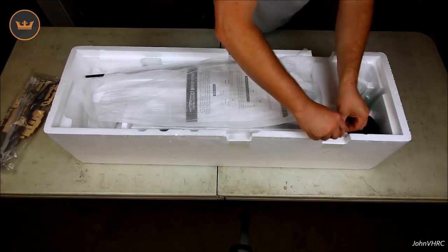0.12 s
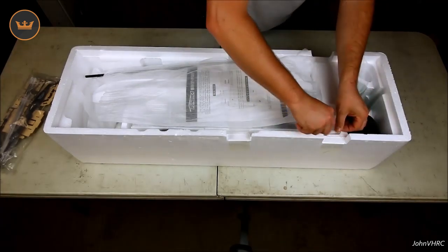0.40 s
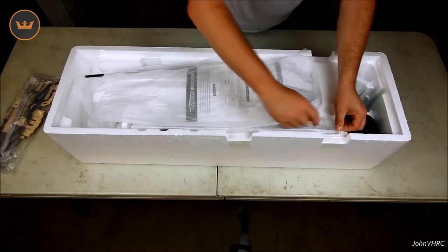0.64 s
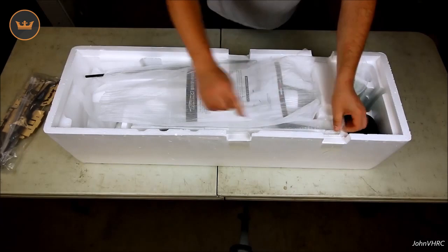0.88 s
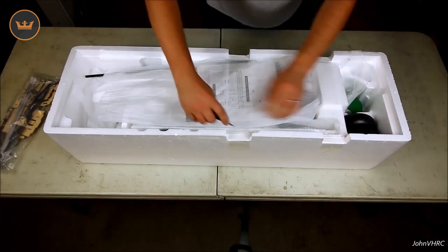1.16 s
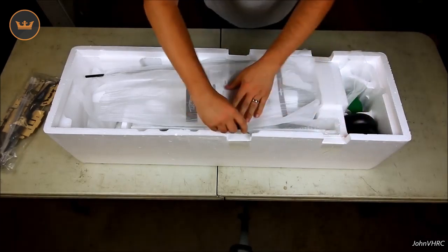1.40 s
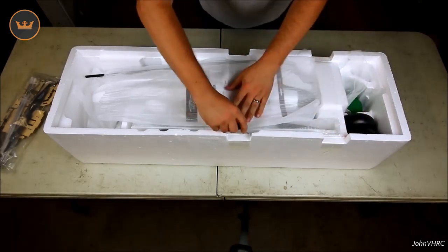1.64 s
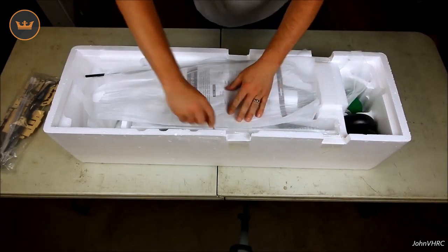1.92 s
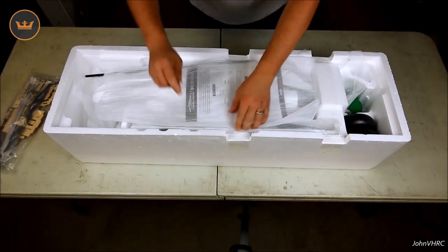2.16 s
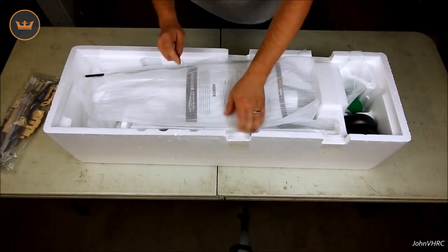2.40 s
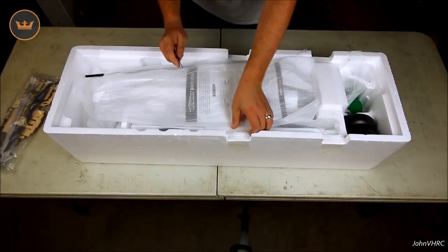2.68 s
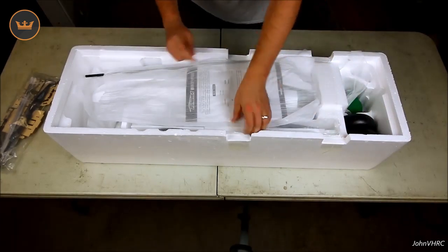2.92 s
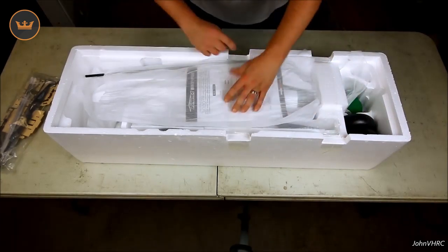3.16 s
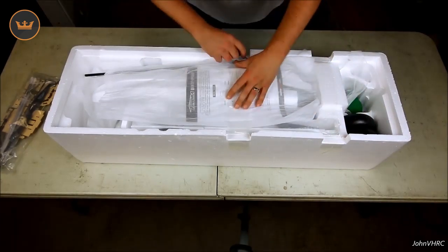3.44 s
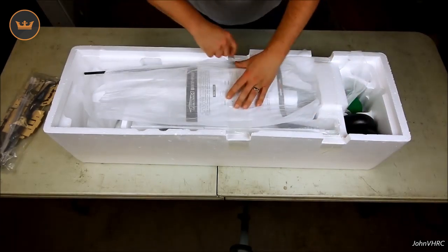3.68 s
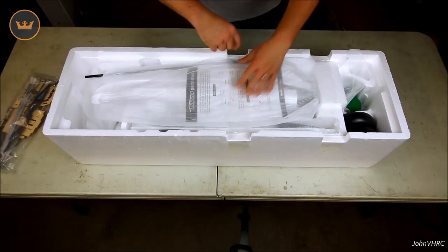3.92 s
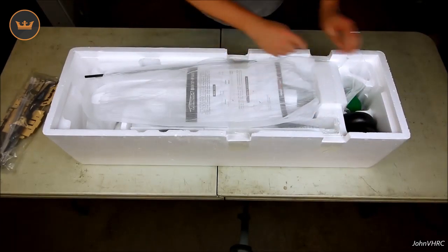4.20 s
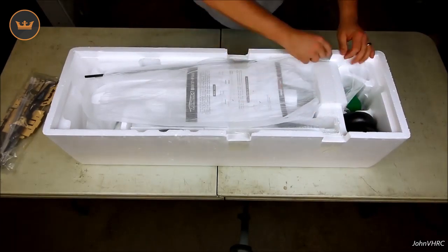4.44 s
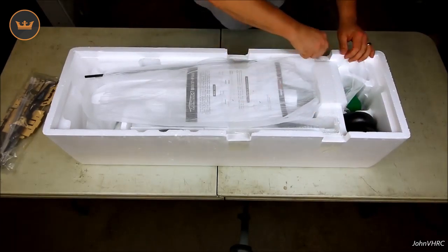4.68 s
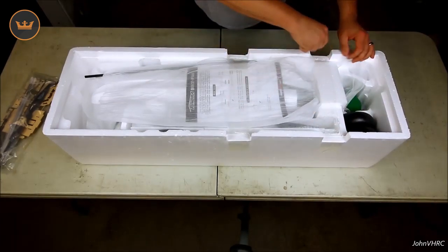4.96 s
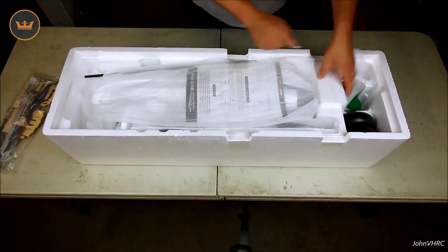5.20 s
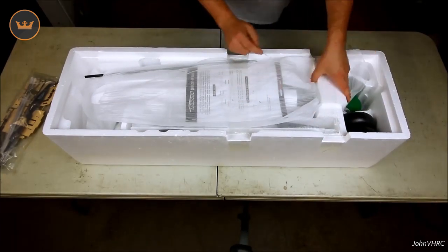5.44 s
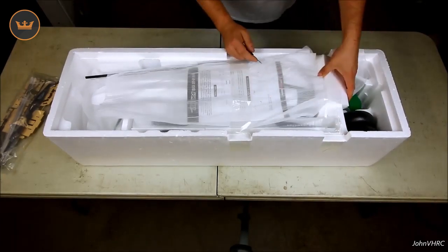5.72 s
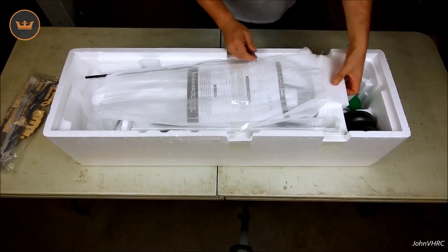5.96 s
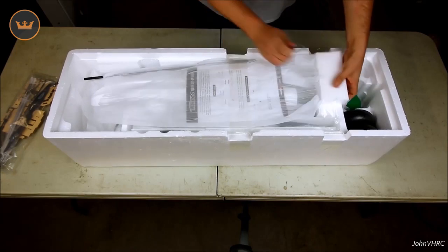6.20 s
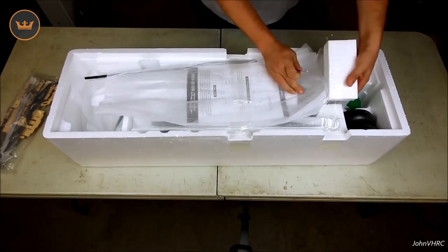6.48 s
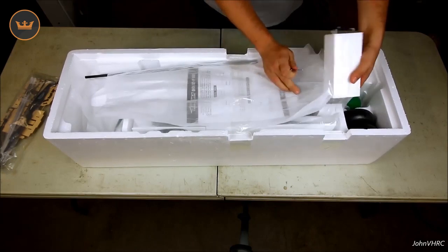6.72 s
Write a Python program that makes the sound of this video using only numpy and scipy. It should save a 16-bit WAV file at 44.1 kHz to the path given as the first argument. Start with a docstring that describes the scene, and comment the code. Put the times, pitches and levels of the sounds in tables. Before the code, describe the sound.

Close stereo pickup in a small room, slightly from the right, over faint steady hum and hiss. At about 0.2 s a sharp plastic snap starts a crinkle, with smaller pops and rustles at 0.35-0.9 s. Near quiet follows, with faint scuffs around 1.3-1.5 s. A loud cluster of cracks bursts at 1.6-1.8 s with soft low table thumps. From 2 to 3.3 s there are only light ticks, thin rustles and small finger scuffs. Another tight burst of duller, lower pops comes at 3.6-3.7 s, then fades. After a lull, bright snaps arrive at 4.6-4.8 s. From 5.2 s the crinkling thickens, with the strongest crack near 5.6 s, and a fizzy rustle swells around 6.1 s. At 6.4 s a very short hollow foam judder and hard snaps lead into dense, rapid crackling that lasts to the end, near 6.9 s.

```python
"""Plastic film and tape, peeled by hand off foam parts in a shipping box on a table in a small room.
The film buckles in sharp snaps (runs of cracks through a ringing patch) over a rustle of sparse clicks.
Pushes ring the modes of the foam box; scuffs and a judder are slips through a resonance; jolts thump the table.
A close pair of microphone ports hears it a little from the right, over a faint hum and hiss of shaped noise."""
import sys
import numpy as np
from scipy import signal
from scipy.fft import rfft, irfft
from scipy.io import wavfile
from scipy.ndimage import uniform_filter1d

SR = 44100
rng = np.random.default_rng(int(sys.argv[2]) if len(sys.argv) > 2 else 0)


def volts(x):
    """Linear amplitude factor 10**(x/20) for a level x in dB, scalar or array-like."""
    e = np.asarray(x, float) / 20
    return 10 ** e


def to_wav(sig):
    """Store sig (one row per channel, or 1-D mono) as 16-bit WAV at the path in sys.argv[1].

    Samples outside -1..1 are clipped; the rate is SR.
    """
    pcm = np.clip(np.atleast_2d(sig), -1, 1) * 32767
    pcm = np.round(pcm).astype(np.int16)
    wavfile.write(sys.argv[1], SR, pcm.T)  # frames by channels


N = 301644


def evened(x):
    """Scales to rms 1."""
    return x / np.sqrt(np.mean(x ** 2) + 1e-20)


def read(points, f_hz):
    """Interpolates a spectrum on a log-frequency axis."""
    f, value = np.transpose(points)
    return np.interp(np.log(f_hz + 1), np.log(f + 1), value)


def add(mix, t_s, sound):
    """Lays a sound into the mix at a time."""
    part = mix[..., round(t_s * SR):][..., :sound.shape[-1]]
    part += sound[..., :part.shape[-1]]


def causal(gain):
    """Minimum-phase impulse response for a gain over the full circle of frequencies."""
    log_gain = np.log(gain)
    phase = -signal.hilbert(log_gain).imag
    return np.fft.ifft(np.exp(log_gain + 1j * phase)).real[:1024]


def ring(f_hz, width_hz, size=2048):
    """One dying mode of energy 1."""
    t = np.arange(size) / SR
    taps = np.exp(-np.pi * width_hz * t) * np.sin(2 * np.pi * f_hz * t)
    return taps / np.linalg.norm(taps)


# relative spectrum of hum and hiss: f/Hz, level/dB
AIR = [(18, -45.5), (30, -9.5), (90, -7.5), (127, -6.5), (199, -13.5), (239, -9.5), (295, -19.5),
       (988, -18.5), (1320, -25), (16000, -37)]
# left-right likeness of the air: f/Hz, coherence/1
AIR_SAME = [(60, 0.547), (950, 0.0819), (15000, 0.04)]


def air(rms_db=-56):
    """Steady hum and hiss: shaped noise, alike at both ports only in the bass."""
    hz = np.fft.rfftfreq(2048, 1 / SR)
    a, b, c, d = rng.standard_normal((N // 512 + 5, len(hz), 4)).T
    same = np.clip(read(AIR_SAME, hz), -1, 1)[:, None]
    left, other = a + 1j * b, c + 1j * d
    right = same * left + np.sqrt(1 - same ** 2) * other
    z = np.array([left, right]) * volts(read(AIR, hz))[:, None]
    noise = signal.istft(z, nperseg=2048, noverlap=1536)[1][:, :N]
    return volts(rms_db) * evened(noise)


# quick pulls, after which the sheet settles:
# peak t/s, rustle level/dB, settling by 20 dB t/s, pressure on foam re rustle/dB, thin fizz re rustle/dB
TUGS = [(.105, -49.5, 0.87, -8, 2.5), (.188, -31.5, 0.1883, -6, -2), (.34, -37.5, 0.2552, -13.5, -10),
        (.452, -34, 0.0941, -5, -9), (.592, -36, 0.1534, -13.5, -7.5), (.955, -42, 0.0469, -7, -24),
        (1.325, -45.5, 0.1033, -4, -11), (1.44, -49.5, 0.2478, -4.5, -11.5), (1.567, -47, 0.1476, 1, -16),
        (1.598, -48, 0.138, -1.5, -12), (1.638, -32, 0.2491, -7.5, -28), (1.768, -28.5, 0.1416, -3, -6),
        (2.09, -48, 0.2365, -6, -3), (2.228, -42, 0.0619, -9, -6), (2.365, -46.5, 0.1076, -5.5, -1),
        (2.452, -48.5, 0.1304, -3.5, -12.5), (2.54, -44, 0.193, -1.5, -5),
        (2.768, -40.5, 0.0354, -15.5, -9.5), (3.42, -46, 0.0918, -2.5, -25), (3.505, -47, 0.2324, -4.5, -8),
        (3.588, -32, 0.2735, -4, -27), (3.652, -30, 0.0673, -7.5, -7), (3.69, -29, 0.0168, -4.5, -18.5),
        (3.708, -28.5, 0.1447, -5, -18.5), (3.845, -43, 0.1576, -22, 1), (4.336, -41.5, 0.0947, -11, -8),
        (4.442, -47, 0.1004, -5.5, -11), (4.628, -35, 0.1556, 1.5, -5), (4.744, -27, 0.075, -6.5, -16),
        (4.78, -31.5, 0.1067, -8.5, -17.5), (5.206, -37.5, .5, -10.5, -1.5),
        (5.408, -28, 0.2591, -9.5, -9.5), (5.587, -25.5, 0.1529, -8.5, -7), (5.797, -37, 0.3865, -8.5, 3),
        (6.062, -32.5, 0.2447, -13.5, -9), (6.245, -34, 0.0632, -9.5, 2), (6.303, -34, 0.2342, -16.5, 1.5),
        (6.4, -36, 0.12, 5, -16.5), (6.484, -31, 0.1945, -11.5, -10), (6.625, -32.5, 0.03, -4.5, -6.5)]
# hand drags over the sheet, swelling and fading alike:
# middle t/s, rustle level/dB, fade by 20 dB t/s, pressure re rustle/dB, fizz re rustle/dB
SLIDES = [(.06, -52.5, 0.5912, -1, -10.5), (.83, -53.5, 0.2103, -6.5, -18),
          (.874, -33, 0.0379, -16.5, -2.5), (2.35, -47, 0.0668, -12.5, 1.5),
          (2.398, -42.5, 0.066, -5, -7.5), (2.61, -46, 0.1125, -10.5, -5.5), (2.75, -44, 0.057, -12, -4.5),
          (4.39, -54.5, 0.0861, 5.5, -12.5), (5.245, -38.5, 0.0356, -10, -3), (2.85, -47, 0.14, -11.5, -3),
          (2.955, -42, 0.1256, -11.5, 0.5), (3.18, -48.5, 0.0618, 1.5, -8.5),
          (3.278, -46.5, 0.0663, -5, -6.5), (4.585, -44, 0.0513, -6.5, -5), (4.675, -31, 0.0327, -2, -5),
          (4.95, -49, 0.2367, -2.5, -3.5), (5.94, -33.5, 0.1467, -13.5, -6.5),
          (6.135, -29.5, 0.1674, -13.5, -0.5), (6.35, -29, 0.0672, -23.5, 1),
          (6.652, -23, 0.0495, -7.5, -1.5), (6.78, -28, 0.1484, -7.5, -10)]
# hands lying still: rustle level/dB, pressure re rustle/dB, fizz re rustle/dB
REST = (-66.5, -3, -5)


def handling(tug_rise_s=0.019585, curve=1.1036):
    """Rustle, pressure and fizz over time: the powers of all tugs and slides add up."""
    t = np.arange(0, N / SR + .002, .001)
    rest_db = REST[0] + np.array([0, REST[1], REST[2]])
    power = np.ones((len(t), 1)) * volts(rest_db) ** 2
    for table, rise_s in ((TUGS, tug_rise_s), (SLIDES, None)):
        for peak_s, db, fade_s, push_db, fizz_db in table:
            away = np.where(t < peak_s, (peak_s - t) / (rise_s or fade_s), (t - peak_s) / fade_s)
            drop_db = 20 * away[:, None] ** curve  # curve over 1: lingers before it drops
            power = power + volts(db - drop_db + [0, push_db, fizz_db]) ** 2
    return [np.interp(np.arange(N) / SR, t, level) for level in np.sqrt(power).T]


def creases(count, per_s, spread_db, clump_db, clump_s):
    """Rows of sparse clicks of uneven size, each row busy and idle by turns; total power 1."""
    size = round(clump_s * SR)
    drift = uniform_filter1d(rng.standard_normal((count, N)), size)
    clumps = evened(uniform_filter1d(drift, size))
    clicks = (rng.random((count, N)) < per_s / SR) * rng.choice([-1., 1.], (count, N))
    size_db = spread_db * np.minimum(rng.exponential(1, (count, N)), 4)
    clicks *= volts(size_db + clump_db * np.tanh(clumps))
    return evened(clicks) / np.sqrt(count)


# body of a crease: f/Hz, level/dB
FILM = [(300, -8.5), (800, -3.5), (2000, -4), (4000, -6), (6000, -12.5), (12000, -14.5), (16000, -22)]
# edge of a crease: f/Hz, level/dB
FIZZ = [(2000, -46.5), (4500, 9), (6000, 10.5), (10000, 8.5), (14000, -0.5), (17000, -7)]


def colours():
    """Frequencies in Hz, and the gains of film body and crease edge, each of energy 1."""
    hz = abs(np.fft.fftfreq(4096, 1 / SR))
    return hz, evened(volts(read(FILM, hz))), evened(volts(read(FIZZ, hz)))


def patch(film, f, ring_hz, ring_db, sharpness):
    """Gain of the film where one freed patch rings at its own pitch."""
    peak_db = ring_db / (1 + (2 * sharpness * (f / ring_hz - 1)) ** 2)
    return evened(film * volts(peak_db))


# modes of the foam box: f/Hz, width/Hz, level/dB
FOAM = [(93.076, 13.4, -12), (121.08, 59.1, -11), (220.84, 65.8, 2), (339.84, 118.38, 2), (490, 80, 1.5),
        (610, 133.06, 1), (718.31, 35.19, -1.5)]


def box(push):
    """A push rings the modes of the foam box, in alternating sign."""
    taps = sum((-1) ** k * volts(db) * ring(hz, width_hz, size=4096)
               for k, (hz, width_hz, db) in enumerate(FOAM))
    return signal.oaconvolve(push, taps[None] / np.linalg.norm(taps), axes=1)[:, :N]


# samples by which each part of the sheet reaches the left port after the right
LAGS = [2, 0, 2, 2]
# the tighter the sheet is pulled, the more its small high patches ring: t/s, slope/(dB per octave)
TAUT = [(.2, -2.5), (.8, .5), (1.3, -1.5), (1.7, -.5), (2.1, .5), (2.55, -1.5), (2.95, .5), (3.2, -2.5),
        (3.75, -2.5), (3.86, 1.5), (4.35, -1.5), (4.75, 1.5), (5.25, .5), (5.6, -2.5), (5.9, 1.5),
        (6.12, 2.5), (6.33, 3.5), (6.5, .5), (6.66, 1.5), (6.84, -.5)]


def rustle():
    """Tiny creases all over the sheet: twelve patches crackle by turns, each in its own colour."""
    body, push, fizz = handling()
    f, film, edge = colours()
    pitches_hz = np.geomspace(800, 5500, 12)
    rings = np.array([causal(patch(film, f, hz, 13, 3.5)) for hz in pitches_hz])
    slope_db = np.interp(np.arange(N) / SR, *np.transpose(TAUT))
    share = volts(np.log2(pitches_hz)[:, None] * slope_db)
    share /= np.sqrt(np.mean(share ** 2, 0))
    clicks = body * share * creases(len(rings), 430, 3.7, 5, .012)
    crackle = signal.oaconvolve(clicks, rings, axes=1)[:, :N]
    edges = fizz * creases(len(LAGS), 2200, 3.4, 3.5, .004)
    hiss = signal.oaconvolve(edges, causal(edge)[None], axes=1)[:, :N]
    rumble = box(push * creases(len(LAGS), 1500, 2.629, 3.765, 0.00845))
    return crackle.reshape(-1, len(LAGS), N).sum(0) + hiss + rumble


# one row a snap: peak t/s, film level/dB, push into foam re film/dB, sizzle re film/dB, film ring f/Hz
SNAPS = [(0.167, -35, 6, -21, 1729), (0.181, -14, -5.5, -4.5, 1984), (0.335, -25, -2.5, 2, 1969),
         (0.375, -31.5, -2.5, -4, 1533), (0.533, -33.5, -8, 7.5, 1024), (0.588, -24, -14, -12.5, 1378),
         (0.604, -27, -3, -9.5, 2374), (0.64, -29, -16.5, -8.5, 2323), (0.662, -30, -9.5, 1, 3271),
         (0.733, -29, -39, -10.5, 2316), (0.867, -27, -20.5, -4, 3584), (1.567, -43.5, 6.5, -2.5, 1030),
         (1.6, -35.5, -12, 12.5, 5604), (1.632, -11.5, -30, -7, 1511), (1.71, -18.5, -3, -10, 1639),
         (1.758, -16, -24, -3, 2409), (1.776, -16.5, -10, -17, 946.6), (1.783, -15.5, -11.5, -2, 904.8),
         (2.081, -46, -4.5, 13, 6420), (2.126, -47, -5, 7.5, 2100), (2.147, -37.5, -5.5, 3, 1815),
         (2.165, -39, -25, -8, 2995), (2.226, -34, -4, -5.5, 976), (2.275, -45, 1.5, 8.5, 1790),
         (2.344, -46, -10, 7, 3000), (2.362, -36, -17.5, 2.5, 2273), (2.447, -49.5, -8, 6.5, 2500),
         (2.537, -38, -5, -8, 1300), (2.59, -41, -15, -8, 2460), (2.743, -42.5, -13, 0, 2995),
         (2.77, -38.5, -14.5, -10.5, 2385), (2.909, -38, -12.5, 3.5, 1935), (3.017, -48, -13.5, 9, 4003),
         (3.095, -39, -3, -18, 1203), (3.14, -39, -19.5, -23.5, 1718), (3.527, -40.5, -12.5, -21.5, 1338),
         (3.583, -15, -3.5, -22, 765.8), (3.651, -20.5, -27, -10.5, 2543), (3.667, -21.5, -10, -4.5, 1071),
         (3.691, -27, 2, -20, 900), (3.703, -22.5, -10, -2.5, 2491), (3.708, -14.5, -1.5, -24.5, 1418),
         (3.717, -22, -3.5, -12.5, 1298), (3.846, -38, -20, 6, 3232), (3.881, -36, -15, -20, 1900),
         (4.583, -38.5, -5, -5, 1965), (4.603, -30.5, -8, -12, 2352), (4.625, -18, -5, -8, 3542),
         (4.683, -28.5, -10, -2.5, 1953), (4.742, -21, -0.5, -2.5, 2325), (4.759, -12.5, -18.5, -3.5, 3088),
         (4.905, -36, -3.5, -6, 2420), (5.2, -32.5, -10.5, -9.5, 1974), (5.363, -31.5, -13, -8, 3068),
         (5.399, -22.5, -11.5, -2.5, 2326), (5.44, -28.5, -4, -13, 901), (5.457, -23, -15.5, -4, 1096),
         (5.538, -25, -8, -14, 1498), (5.578, -9, -7.5, -4, 3610), (6.112, -25, -20, -10, 3900),
         (6.365, -13, -5, -16.5, 3423), (6.408, -21, -5.5, -18.5, 3614), (6.414, -12.5, -22.5, -15.5, 3885),
         (6.423, -18, -21.5, -15.5, 2525), (6.479, -22, -8.5, -17.5, 1210), (6.495, -24.5, -28, 1.5, 1686),
         (6.539, -25, -1.5, -6.5, 1217), (6.569, -24, -9, -8, 2325), (6.605, -36.5, -10.5, 5.5, 2986),
         (6.619, -25.5, 0.5, -4.5, 805.3), (6.647, -20, -6, -8, 1970), (6.675, -22, -8, -8, 2400),
         (6.712, -26, -3, -8, 2080), (6.737, -19.5, -5, -12, 1107), (6.761, -20.5, -15, -2.5, 1095),
         (6.783, -24, -0.5, -11, 1869), (6.798, -20, -5.5, -24, 1055)]


def snaps(rise=0.6471, plain_ms=1.8158, sizzle_db_per_halving=30):
    """Each buckle is one main crack in a quick run of small ones; the freed patch rings a few cycles."""
    lead, crack, ring_db, sharpness = 400, -10, 8, 2.5  # lead in samples
    push, out = np.zeros((2, len(LAGS), N))
    t = (np.arange(3000) - lead) / SR
    f, film, edge = colours()
    chance = rng.standard_normal((len(SNAPS), 2, len(t)))
    for k, (peak_s, db, push_db, sizzle_db, hz) in enumerate(SNAPS):
        ms = plain_ms * .5 ** (sizzle_db / sizzle_db_per_halving)  # more sizzle: over sooner
        u = t / (ms / 1000)
        envelope = np.exp(np.where(u < 0, u / rise, -u))
        cracks = chance[k, 0] * abs(chance[k, 1]) * envelope
        cracks[lead] = crack / ms  # a short buckle is almost one crack
        cracks *= volts(db) / np.sqrt(uniform_filter1d(cracks ** 2, 66).max())
        dulled = film / np.hypot(1, f / hz / 3.5)
        body = patch(dulled, f, hz, ring_db, sharpness)
        taps = causal(np.hypot(body, volts(sizzle_db) * edge))
        start_s = peak_s - lead / SR
        add(out[k % len(LAGS)], start_s, signal.fftconvolve(cracks, taps))
        add(push[k % len(LAGS)], start_s, volts(push_db) * cracks)
    return out + box(push)


# a finger or foam edge scuffs the foam, one hollow tone stands out: t/s, length/s, level/dB, f/Hz
SCUFFS = [(.371, 0.01801, -35.5, 347.1), (.442, 0.03835, -38.5, 350.3), (1.318, 0.065, -43, 681.4),
          (1.42, 0.1149, -49, 719.3), (1.45, 0.09, -52, 1100), (2.533, 0.02473, -43, 800.8),
          (3.414, 0.02076, -47, 1416), (4.328, 0.06607, -51.5, 832.3), (6.36, 0.01032, -22, 610)]


def scuffs(slips_per_s=900, sharpness=5.5):
    """Uneven slips under the stroke, heard through one steep resonance."""
    out = np.zeros((len(LAGS), N))
    chance = rng.random((len(SCUFFS), 2, SR // 5))
    for k, (t_s, length_s, db, hz) in enumerate(SCUFFS):
        size = round(length_s * SR)
        mode = ring(hz, hz / sharpness)
        hollow = np.convolve(mode, mode)
        hollow /= np.linalg.norm(hollow)
        slips = (chance[k, 0, :size] < slips_per_s / SR) * (chance[k, 1, :size] - .5)
        slips = slips * signal.windows.tukey(size, .2)
        add(out[k % len(LAGS)], t_s, volts(db) * np.convolve(evened(slips), hollow))
    return out


# a hand jolts the table: t/s, peak level/dB
THUMPS = [(1.64, -38), (1.715, -37), (1.782, -31), (2.11, -48), (2.226, -46), (3.585, -37), (3.708, -38),
          (4.628, -38), (4.745, -36)]
# modes of the table top: f/Hz, width/Hz, level/dB
TABLE = [(90, 20, 0.5), (132, 22, -0.5)]


def thumps():
    """Each jolt rings the table top."""
    out = np.zeros(N)
    taps = sum(volts(db) * ring(hz, width_hz, size=8192) for hz, width_hz, db in TABLE)
    taps *= np.tanh(np.arange(len(taps)) / SR / .012)  # a soft hand
    for t_s, db in THUMPS:
        add(out, t_s, volts(db) * taps / abs(taps).max())
    return out


# the foam block judders out of its seat:
# t/s, length/s, level/dB, slip rate at start/(1/s), slip rate at end/(1/s), ring f/Hz, width/Hz
JUDDER = (6.3835, .021, -17.5, 250., 200., 300., 300.)


def judder():
    """Even stick and slip, slowing down; each slip knocks the block."""
    start_s, length_s, db, first, last, hz, width_hz = JUDDER
    t, out = np.arange(round(length_s * SR)) / SR, np.zeros(N)
    turns = np.cumsum(first + (last - first) * t / length_s) / SR
    slips = -np.diff(np.ceil(turns), prepend=0)
    knocks = np.convolve(slips - slips.mean(), ring(hz, width_hz, size=len(t)))
    add(out, start_s, volts(db) * evened(knocks))
    return out


# decay of the diffuse tail: f/Hz, t60/s
ROOM = [(150, 0.5714), (400, 0.3853), (1040, 0.2319), (2760, 0.5142), (7280, 0.43104)]
# table, box walls, ceiling: nominal delay/ms, level/dB
ECHOES = [(2.2, -8), (7.5, -12.5), (21, -35.5)]


def room(x, lag, tail_db=-6, bass_alike_hz=900):
    """Near echoes, then a diffuse tail that builds up and dies by band; long waves reach both ports alike."""
    taps = np.zeros((2, SR // 2))
    at = np.arange(300, SR // 2 - 20, 20) + rng.integers(0, 20, (2, (SR // 2 - 301) // 20))
    np.put_along_axis(taps, at, rng.choice([-1., 1.], at.shape), 1)
    hz, t, z = signal.stft(taps, SR, nperseg=256)
    alike = 0.85 / (1 + (hz / bass_alike_hz) ** 2)[:, None]
    z[1] = alike * z[0] + np.sqrt(1 - alike ** 2) * z[1]
    decay = volts(-60 * t / read(ROOM, hz)[:, None])
    build_up = np.tanh(t / 0.00466)
    tail = signal.istft(z * decay * build_up, SR, nperseg=256)[1]
    tail *= volts(tail_db) / np.linalg.norm(tail[0])
    for (ms, db), (path, left, right) in zip(ECHOES, rng.random((len(ECHOES), 3))):
        delay = round(ms * (.85 + .3 * path) * SR / 1000)
        at = delay + (5 * np.array([left, right])).astype(int)
        tail[[0, 1], at] += volts(db)  # each echo has its own path and side
    tail[[0, 1], [lag, 0]] += 1  # direct sound
    return signal.fftconvolve(x[None], tail, axes=1)[:, :N]


def scene():
    """Every part of the sheet has its own path through the room; the air lies under all."""
    parts = snaps() + scuffs() + rustle()
    parts[0] += judder() + thumps()
    return sum(room(part, lag) for part, lag in zip(parts, LAGS)) + air()


def roll_off(x):
    """The treble ends steeply here."""
    return signal.sosfilt(signal.butter(12, 16490, fs=SR, output="sos"), x)


# sensitivity of left over right port: f/Hz, level/dB
PORTS = [(60, -4.5), (500, -2), (3000, -0.2671), (14000, -1)]


def record(dry):
    """The ports differ in sensitivity, cut deep bass and limit the band; peaks stop at full scale."""
    low_hz, edge_hz = 83.67, 15700
    hz = np.fft.rfftfreq(N, 1 / SR)
    tilt = volts(read(PORTS, hz) / 2)
    bass_cut = hz ** 2 / (hz ** 2 + low_hz ** 2)
    band = bass_cut / np.sqrt(1 + (hz / edge_hz) ** 200)
    heard = irfft(rfft(dry) * band * np.array([tilt, 1 / tilt]), N)
    mix = np.clip(heard, -1, 1)
    return roll_off(mix)


dry = scene()
out = record(dry)
to_wav(out)
```